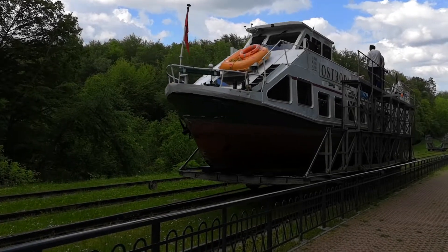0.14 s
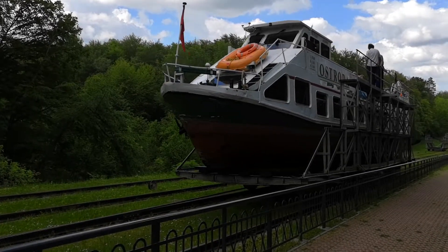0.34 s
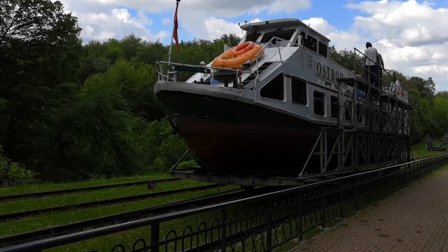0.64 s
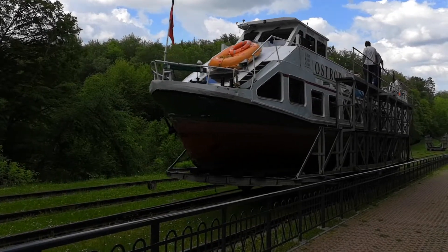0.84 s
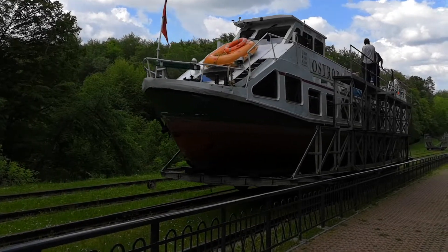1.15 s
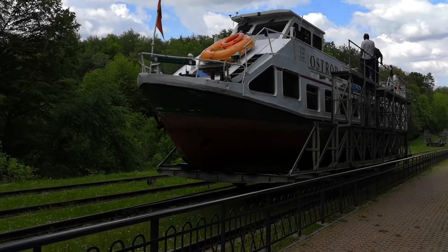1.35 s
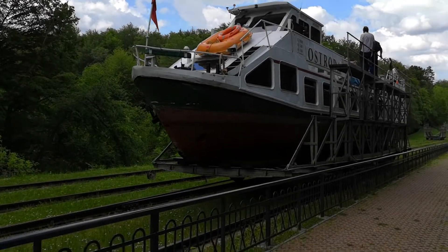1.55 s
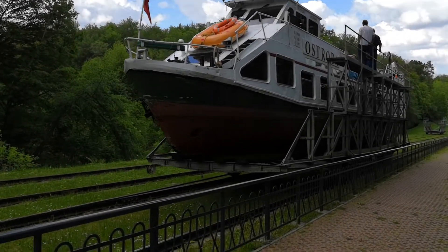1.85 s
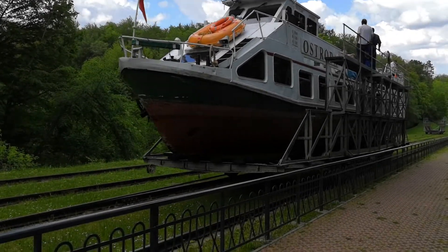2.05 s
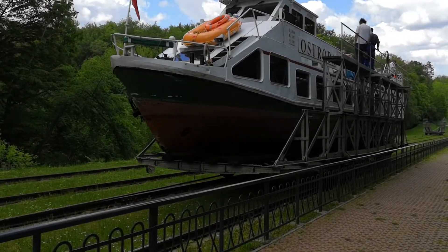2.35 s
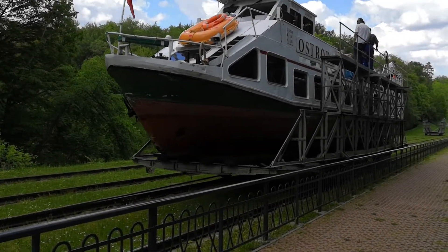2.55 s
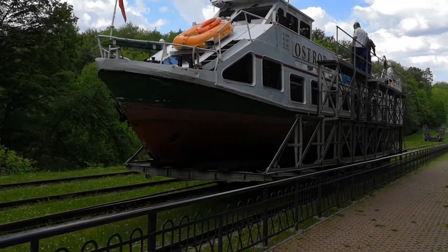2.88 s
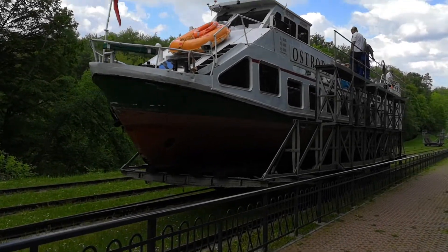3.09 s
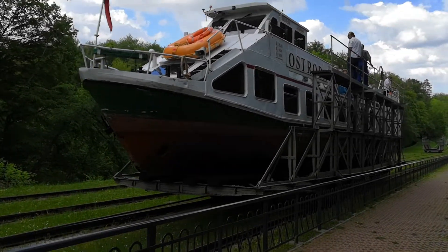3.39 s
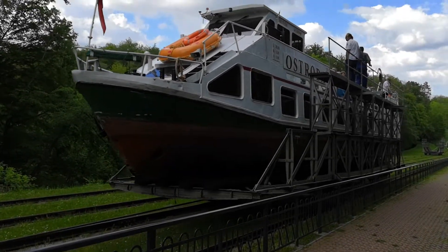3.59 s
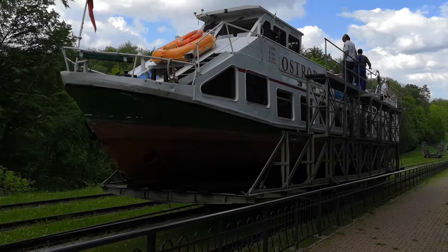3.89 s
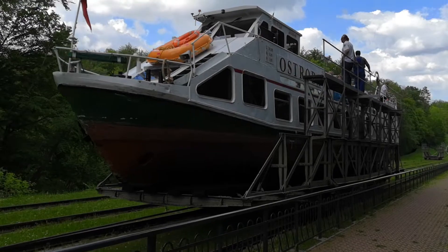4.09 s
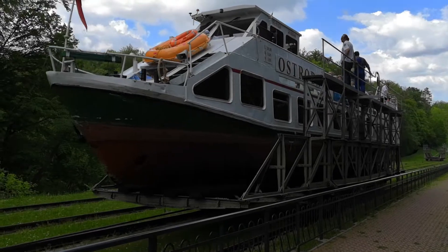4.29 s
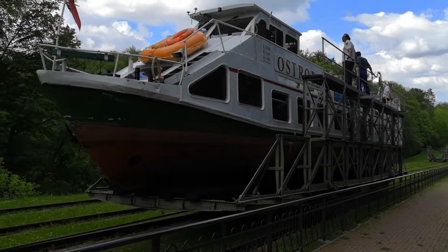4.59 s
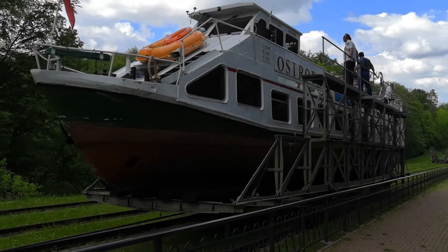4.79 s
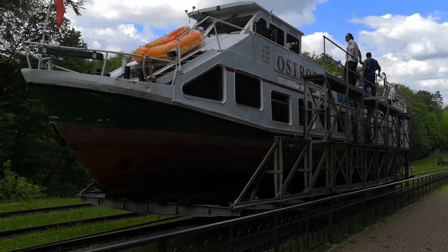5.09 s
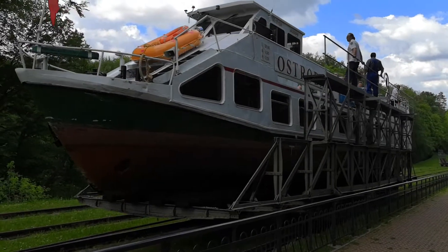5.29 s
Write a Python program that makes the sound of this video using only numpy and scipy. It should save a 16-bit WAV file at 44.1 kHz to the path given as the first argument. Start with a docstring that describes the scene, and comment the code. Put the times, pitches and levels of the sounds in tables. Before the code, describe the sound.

Two heavy metallic clunks, each trailing a rattle and jingle of loose steel, with small sharp clicks between, over quiet outdoor rumble and rustle.

```python
"""Outdoor rails by a wooded slope: a steel carriage with a boat on it, a little to the right.
Twice a wheel drops over a rail joint: noise thuds and ringing modes boom, and the frame sways.
Random blows on short noise modes make its loose parts rattle and jingle; steel clanks, unsteady tones squeak.
Filtered bursts click close by, over a low noise rumble, rustling trees and gliding bird tones."""
import sys
import numpy as np
from scipy import signal
from scipy.fft import rfft, irfft, next_fast_len
from scipy.io import wavfile
from scipy.ndimage import map_coordinates

SR = 44100
rng = np.random.default_rng(int(sys.argv[2]) if len(sys.argv) > 2 else 0)


def log_audio(samples):
    """Write samples as a 16-bit WAV file to the path given in sys.argv[1]."""
    # one column per channel
    frames = np.atleast_2d(samples).T
    # limit to full scale, then quantise
    limited = np.clip(frames, -1, 1)
    pcm = np.round(limited * 32767).astype(np.int16)
    wavfile.write(sys.argv[1], SR, pcm)


N = 239704

# likeness of the two channels, for the steel, things close by and open air: (frequency [Hz], correlation)
STEEL_ALIKE = [(110, .999), (200, .97), (330, .75), (520, .4), (900, .35), (2200, .3), (5000, .15),
               (12000, .1)]
NEAR_ALIKE = [(200, .95), (1000, .75), (2500, .45), (6000, .2)]
AIR_ALIKE = [(90, .999), (170, .96), (280, .6), (420, .1), (900, -.15), (2500, -.05), (12000, 0)]
# left level over right level, for the same three: (frequency [Hz], difference [dB])
STEEL_PAN = [(70, 0), (180, -.8), (400, -2.8), (900, -3), (2200, -4.5), (5000, -4.3), (9000, -7)]
NEAR_PAN = [(150, -16), (400, -19), (1200, -3), (2500, -1.5), (5000, -8.5), (9000, -7)]
AIR_PAN = [(60, 0), (150, -.3), (380, -3), (950, -2.7), (2400, -3.6), (6000, -3.6), (15000, -.5)]
# phase by which the left channel leads: (frequency [Hz], lead [rad])
LEFT_LEAD = [(50, -.04), (110, -.12), (200, -.27), (330, -.55), (500, -1.2), (900, .3), (2200, -1.1),
             (6000, -2)]
# the front wheel, then the rear wheel, drops over the joint: (time [s], thud [dB], rebound delay [s],
# sway [dB], rattle [dB], jingle [dB], build-up of the jingle [s])
DROPS = [(1.531, -28, .104, -33, -40, -53.5, 0.057), (4.075, -21.5, .068, -30, -42, -54.5, .04)]
HALVES = np.array([[.5], [-.5]])  # shares a left-right difference between the channels


def amp(db):
    """Decibels to gain."""
    return 10 ** (np.asarray(db) / 20)


def unit(x):
    """Scale so that the average of the channels has rms 1."""
    return x / np.sqrt(np.mean(np.atleast_2d(x).mean(0) ** 2) + 1e-20)


def along(points, hz):
    """Read (frequency [Hz], value) points on a log frequency axis."""
    f, v = np.transpose(points)
    return np.interp(np.log(hz + 1), np.log(f + 1), v)


def clock(size=N):
    """Seconds, sample by sample."""
    return np.arange(size) / SR


def curves(rows, outside=None):
    """One value per sample for each column after the time."""
    s, *cols = np.transpose(rows)
    return [np.interp(clock(), s, c, outside, outside) for c in cols]


def wobble(rate, size=N):
    """A smooth random curve with rate knots a second."""
    knots = rng.standard_normal(int(size * rate / SR) + 4)
    return map_coordinates(knots, [clock(size) * rate])


def filtered(x, response):
    """Filter x by a response given as a function of frequency."""
    size = x.shape[-1]
    m = next_fast_len(size + 8192)
    spectrum = rfft(x, m) * response(np.fft.rfftfreq(m, 1 / SR))
    return irfft(spectrum, m)[..., :size]


def noise(size=N):
    """Two unrelated white noises."""
    return rng.standard_normal((2, size))


def placed(pair, colour, alike, pan):
    """Two unrelated signals become one coloured stereo sound of rms 1; colour gives dB at each Hz."""
    def mid_side(hz):
        # the angle between mid and side sets how alike the channels are
        turn = np.arccos(np.clip(along(alike, hz), -1, 1)) / 2
        return amp(colour(hz)) * [np.cos(turn), np.sin(turn)]

    def ports(hz):
        return amp(HALVES * along(pan, hz)) * np.exp(1j * HALVES * along(LEFT_LEAD, hz))

    mid, side = filtered(pair, mid_side)
    return unit(filtered(np.array([mid + side, mid - side]), ports))


def bed(pair, spectrum, alike=STEEL_ALIKE, pan=STEEL_PAN):
    """A stereo sound whose spectrum is given as points."""
    return placed(pair, lambda hz: along(spectrum, hz), alike, pan)


def hump(hz, centre_hz, octaves):
    """A broad resonance, in dB."""
    return -20 * np.log10(1 + (np.log2((hz + 1) / centre_hz) / octaves) ** 2 / 2)


def dying(t, t60, attack):
    """A quick rise, then a steady fall of 60 dB in every t60 seconds."""
    return np.exp(-np.log(1000) * t / max(t60, 1e-3)) * (1 - np.exp(-t / attack))


def struck(x, envelope):
    """Shape a noise by an envelope; every blow of the same strength carries the same energy."""
    return unit(x * envelope) * np.sqrt(np.mean(envelope ** 2))


def add(out, s, x):
    """Mix x into out from time s."""
    part = out[:, max(round(s * SR), 0):][:, :x.shape[-1]]
    part += x[..., :part.shape[1]]


def wheel(drop, thud, column):
    """A wheel meets both edges of the gap and rebounds: noise thuds, with the frame's modes ringing on."""
    # frame modes: (frequency [Hz], t60 [s], front-wheel strike [dB], rear-wheel strike [dB])
    frame_modes = [(53.9, 1, -38, -41), (101.8, 0.43, -30.5, -41), (134.5, 0.2, -46, -22),
                   (157, 0.45, -50, -36), (214, 0.5, -37.5, -28.5), (270.1, 0.43, -30, -48),
                   (316.5, 0.32, -32, -28.5), (427.5, 0.79, -41, -46), (521, 0.33, -31.5, -37),
                   (601, 0.23, -49, -38), (636, 0.43, -41.5, -52), (846, 0.34, -59, -39.5),
                   (920, 0.61, -42, -53), (954, 0.73, -56, -50), (1073, 0.31, -60, -49),
                   (1275, 0.64, -48.5, -49)]
    out, t = np.zeros((2, N)), clock(SR)
    s, db, rebound = drop[:3]
    second_edge, rebound_loss_db = 0.023, 9.5  # delay [s], level [dB]
    for delay, loss_db in [(0, 0), (second_edge, 0), (rebound, rebound_loss_db)]:
        blow = struck(bed(noise(SR), thud), dying(t, t60=0.16, attack=0.0055))
        add(out, s + delay, amp(db - loss_db) * blow)
    for hz, t60, *strengths in frame_modes:
        phase = 2 * np.pi * hz * t + 0.36 * wobble(19.5, SR)  # slack joints unsettle the pitch
        ring = np.sin(phase + HALVES * along(LEFT_LEAD, hz)) * amp(HALVES * along(STEEL_PAN, hz))
        add(out, s, amp(strengths[column]) * dying(t, t60, attack=0.0084) * ring)
    return out


def wheels():
    """The front wheel, then the rear wheel, excites the same frame with its own thud and mode strengths."""
    # thud spectra: (frequency [Hz], level per Hz [dB])
    front_thud = [(53, -30), (90, -3), (271, 3), (463, -5.5), (524, -19), (734, -4), (923, -1.5),
                  (1060, -19), (1250, -5.5), (1350, -18.5), (2180, -27), (2390, -17), (3500, -51),
                  (4550, -70), (7700, -120)]
    rear_thud = [(41, -36), (75, -13), (120, 4.5), (165, 0.5), (215, 5.5), (268, -30), (331, -5),
                 (430, -6.5), (540, -17), (740, -17), (830, -19), (1090, -15), (1400, -22.5), (2480, -20),
                 (3500, -30.5), (7000, -110)]
    return wheel(DROPS[0], front_thud, column=0) + wheel(DROPS[1], rear_thud, column=1)


def settling(start, rise, hold, sag, extra_fall):
    """Motion after a jolt builds up, sags while the frame rocks, then falls faster to a faint hum."""
    t = np.maximum(clock() - start, 0)
    rocking = amp(-sag * t - extra_fall * np.maximum(t - hold, 0))
    lingering = amp(-15) * dying(t, t60=2.07, attack=.05)
    return (1 - np.exp(-(t / rise) ** 3)) * np.hypot(rocking, lingering)


def chatter(rate, t60, spread_db, ringing, count):
    """Loose parts strike at random, rate blows a second in all; each has short noisy modes and a dry contact."""
    out, t = np.zeros((2, N)), clock(SR // 3)
    for _ in range(count):
        happens = rng.random(N) < rate / count / SR
        hits = happens * amp(spread_db * np.clip(rng.standard_normal(N), -2, 2))
        contact = dying(t, t60=0.0076, attack=0.00013)
        part = noise(len(t)) * (ringing * dying(t, t60, attack=0.0011) + contact)
        out += signal.oaconvolve(hits[None], part, axes=1)[:, :N]
    return out


def bar_modes(hz):
    """The narrow resonances of the long bars add in power; the result is in dB."""
    # bar resonances: (centre [Hz], width [Hz], level [dB])
    bars = [(1567, 10, -7), (1700, 40, -15), (1950, 42, 4), (2020, 17, -4), (2530, 27, -3), (2540, 76, 7),
            (2670, 16, -15), (2826, 96, -0.5), (3060, 14, -10), (3126, 47, 2), (3190, 18, -11),
            (3570, 10, -1), (3783, 51, -0.5), (5660, 78, -8.5)]
    powers = [amp(db) ** 2 / (1 + (2 * (hz - centre) / width) ** 2) ** 2 for centre, width, db in bars]
    return 10 * np.log10(sum(powers))


def shaking():
    """The jolted frame sways; heavy bars rattle and light fittings jingle until it settles."""
    # spectra of the three motions: (frequency [Hz], level per Hz [dB])
    sway_spectrum = [(15, -37), (28, -14), (40, 7), (53, 2), (75, 0), (110, 1), (160, -1.5), (215, 0),
                     (360, -16.5), (500, -8.5), (800, -25), (1400, -110)]
    rattle_spectrum = [(160, -19), (280, 0.5), (362, -5.5), (486, -6.5), (607, -13), (935, -7),
                       (1310, -11.5), (1410, -11.5), (1600, -8.5), (2280, -12), (2590, -13), (3730, -22),
                       (4040, -24.5), (4600, -27), (5980, -44), (10100, -120)]
    jingle_spectrum = [(2000, -30), (3200, 6), (3800, -10.5), (4300, -2), (5500, 0.5), (7000, -3),
                       (8200, -7.5), (9600, -10), (11000, -25), (13000, -35), (15500, -57)]
    # how each settles: (hold [s], sag [dB per s], extra fall after the hold [dB per s])
    sway_settles = (0.39, 42.8, 140)
    rattle_settles = (.31, 20.8, 99)
    jingle_settles = (0.26, 3.8, 82)
    sway, rattle, jingle = np.zeros((3, N))
    for s, _, _, sway_db, rattle_db, jingle_db, jingle_rise in DROPS:
        rattle_rise = 0.59 * jingle_rise  # heavy parts get going sooner than light ones
        sway += amp(sway_db) * settling(s, 0.0096, *sway_settles)
        rattle += amp(rattle_db) * settling(s, rattle_rise, *rattle_settles)
        jingle += amp(jingle_db) * settling(s, jingle_rise, *jingle_settles)
    low = sway * bed(noise(), sway_spectrum)
    heavy_blows = chatter(rate=420, t60=0.16, spread_db=3.5, ringing=0.46, count=3)
    bar_ring = placed(heavy_blows, bar_modes, STEEL_ALIKE, STEEL_PAN)
    bars = rattle * (bed(heavy_blows, rattle_spectrum) + amp(-10.5) * bar_ring)
    light_blows = chatter(rate=650, t60=0.22, spread_db=4.5, ringing=0.57, count=3)
    fittings = jingle * bed(light_blows, jingle_spectrum)
    return low + bars + fittings


def clanks():
    """Loose steel slams home: single short noise bursts, each through its own broad resonance."""
    # blows: (time [s], level [dB], centre [Hz])
    blows = [(1.576, -44.5, 2850), (1.647, -36.5, 2720), (1.678, -33, 2220), (1.699, -39, 5800),
             (1.716, -39.5, 4000), (1.734, -38.5, 1600), (1.800, -33.5, 2470), (1.865, -45.5, 2980),
             (2.537, -51.5, 1280), (4.196, -32, 2040), (4.248, -38, 2600), (4.297, -39.5, 2400),
             (4.342, -42.5, 2500), (4.44, -45.5, 2480), (4.545, -47.5, 1430), (4.655, -54, 1800)]
    treble_cut = [(9500, -6), (12500, -8), (15000, -21)]  # (frequency [Hz], gain [dB])
    out, t = np.zeros((2, N)), clock(SR // 3)
    for s, db, hz in blows:
        colour = lambda f: 1.42 * hump(f, hz, octaves=0.41) + along(treble_cut, f)
        steel = placed(noise(len(t)), colour, STEEL_ALIKE, STEEL_PAN)
        add(out, s, amp(db) * struck(steel, dying(t, t60=0.056, attack=0.0016)))
    return out


def squeaks():
    """Steel rubs on steel and sings: thin unsteady tones swell, flutter and ring out."""
    # tones: (time of the peak [s], frequency [Hz], level [dB], t60 [s])
    tones = [(1.599, 6800, -56, .2), (1.605, 3710, -50, 0.45), (1.62, 10800, -63, 0.22),
             (1.628, 11670, -61, .12), (1.635, 7730, -43.5, 0.14), (1.72, 9760, -57, .17),
             (1.76, 3330, -52, .17), (1.82, 7900, -69, .45), (1.888, 2840, -61.5, 0.54),
             (3.125, 9500, -75, .1), (4.308, 7900, -63, 0.73), (4.45, 2690, -53.5, .18),
             (4.468, 2830, -63, 0.98)]
    rise = .023  # s
    out, t = np.zeros((2, N)), clock(SR)
    since = t - 2 * rise  # time from the peak
    for s, hz, db, t60 in tones:
        ring_out = np.exp(-np.log(1000) * np.abs(since) / t60)
        swell = np.where(since < 0, np.exp(-(since / rise) ** 2), ring_out)
        channels = []
        for _ in range(2):
            flutter = amp(3.6 * wobble(47, SR))
            channels.append(flutter * np.sin(2 * np.pi * hz * t + 1.1 * wobble(165.0, SR)))
        tone = np.array(channels) * amp([[-7], [0]])  # weaker on the left
        add(out, s + since[0], amp(db) * struck(tone, swell))
    return out


def ping(hz, db, t60):
    """One brief ring of a small thing close by."""
    t = clock(SR // 3)
    ring = np.sin(2 * np.pi * hz * t + HALVES * along(LEFT_LEAD, hz)) * dying(t, t60, attack=0.0014)
    return amp(db + HALVES * along(NEAR_PAN, hz)) * ring


def click(db, t60, body, tilt_db=0):
    """A short burst in a small hard body; the surroundings answer faintly."""
    t = clock(SR // 3)
    colour = lambda hz: along(body, hz) + tilt_db * np.log2((hz + 1) / 2000)  # tilt in dB per octave
    burst = placed(noise(len(t)), colour, NEAR_ALIKE, NEAR_PAN)
    answer = amp(-27) * dying(t, t60=0.26, attack=0.0036)
    return amp(db) * struck(burst, dying(t, t60, attack=0.00034) + answer)


def knock():
    """Something hard touches, strikes and chatters to rest; later bounces are lighter, brighter and longer."""
    # spectrum of the body: (frequency [Hz], level per Hz [dB])
    knock_body = [(210, -52), (400, -46), (550, -16), (1000, -8), (1200, -17), (1600, -1.5), (2100, -8.5),
                  (2460, 0.5), (3200, -11), (3950, -18), (4450, -43), (5700, -15.5), (6300, -32),
                  (9000, -26), (15000, -50)]
    # ringing modes: (frequency [Hz], level [dB], t60 [s])
    knock_modes = [(598, -52, .06), (1000, -44, 0.091), (1585, -45, 0.037), (2405, -35, 0.034),
                   (3980, -46, .03), (5750, -54, 0.039)]
    strike, strike_db, strike_t60 = 3.2369, -24, 0.014  # time [s], level [dB], t60 [s]
    touch_lead, bounce_gap = .0016, .0027  # s
    out = np.zeros((2, N))
    add(out, strike - touch_lead, click(-35, strike_t60, knock_body, tilt_db=5.5))
    for k in range(4):
        bounce = click(strike_db - 11.5 * k, strike_t60 * 1.7 ** k, knock_body, tilt_db=1.4 * k)
        add(out, strike + k * bounce_gap, bounce)
    add(out, strike, sum(ping(*mode) for mode in knock_modes))
    return out


def snaps():
    """Grit snaps on the paving: each piece cracks as a noise burst and rings at its own pitch."""
    # cracks: (time [s], level [dB], t60 [s], treble tilt [dB per octave], ring [Hz], ring level [dB])
    cracks = [(2.808, -50.5, 0.034, -8, 587, -58), (2.9998, -47.5, 0.025, 4, 1027, -49.5),
              (3.665, -47.5, 0.14, 3.5, 1475, -49), (3.7096, -29.5, 0.017, 4, 3370, -48),
              (3.714, -41.5, 0.033, 1, 1132, -38.5), (3.731, -44.5, 0.081, -2, 1360, -39),
              (3.813, -53.5, 0.054, -1, 1110, -70), (5.301, -51.5, 0.019, -6.5, 1725, -54)]
    # spectrum before the tilt: (frequency [Hz], level per Hz [dB])
    snap_body = [(240, -43), (400, -22), (550, 4.5), (830, -2.5), (1150, 4), (1550, 9), (2150, -9),
                 (2550, 3), (3080, 0), (4070, -15), (5100, -11), (6300, -22.5), (7350, -20), (9200, -29),
                 (11600, -44), (15000, -58)]
    out = np.zeros((2, N))
    for s, db, t60, tilt_db, ring_hz, ring_db in cracks:
        add(out, s, click(db, t60, snap_body, tilt_db) + ping(ring_hz, ring_db, t60=0.068))
    return out


def ticks():
    """Faint bright ticks, each a very short noise burst."""
    # ticks: (time [s], level [dB])
    tick_times = [(0.235, -59), (0.6295, -65), (0.7262, -62), (1.196, -49), (2.9272, -59), (2.9672, -58),
                  (2.9982, -43.5), (3.0595, -54.5), (3.5533, -63), (5.1257, -59), (5.3004, -60),
                  (5.3237, -58)]
    # their spectrum: (frequency [Hz], level per Hz [dB])
    tick_body = [(1000, -10), (4000, -2), (7000, -6), (9200, 5.5), (11000, -9.5), (15000, -22)]
    out = np.zeros((2, N))
    for s, db in tick_times:
        add(out, s, click(db, 0.011, tick_body))
    return out


def scuffs():
    """Soft scuffs and low bumps: bell-shaped swells of narrow noise."""
    # swells: (time of the peak [s], level [dB], centre [Hz], half length [s], half of the hump's width [octaves])
    swells = [(0.158, -78, 8700, 0.083, 0.098), (1.241, -71.5, 8260, 0.051, 0.15),
              (1.45, -55, 115, 0.016, 0.32), (3.105, -44.5, 62, 0.022, 0.36), (3.15, -55, 193, 0.027, 0.11),
              (3.637, -57, 2080, 0.021, 0.3), (3.899, -51.5, 69.5, 0.057, 0.34)]
    out, t = np.zeros((2, N)), clock(SR // 2)
    for s, db, hz, length, octaves in swells:
        start = max(s - t[-1] / 2, 0)
        rub = placed(noise(len(t)), lambda f: 2 * hump(f, hz, 2 * octaves), STEEL_ALIKE, STEEL_PAN)
        add(out, start, amp(db) * np.exp(-((start + t - s) / length) ** 2 / 2) * rub)
    return out


def bird():
    """One thin buzzy chirp of wavering pitch, scattered by the trees as a dying noise echo."""
    # path of the chirp: (time [s], frequency [Hz], level [dB])
    chirp = [(4.928, 7200, -85), (4.945, 8220, -58.5), (4.962, 8000, -62), (4.98, 7870, -67),
             (4.992, 8300, -76), (5.02, 8000, -84)]
    hz, db = curves(chirp, outside=-120)
    call = amp(db) * np.sin(2 * np.pi * np.cumsum(hz + 170 * wobble(540)) / SR)
    trees = noise(SR // 3) * dying(clock(SR // 3), t60=0.16, attack=.002)
    trees /= np.linalg.norm(trees[0])
    return call + 1.35 * signal.oaconvolve(call[None], trees, axes=1)[:, :N]


def far_birds():
    """Faint short whistles from the wood: bell-shaped tones, some gliding upward."""
    # whistles: (time of the peak [s], frequency [Hz], level [dB], half length [s], glide [Hz per s])
    whistles = [(.35, 6800, -86, 0.032, 6000), (0.956, 6700, -91, .04, 5000), (1.015, 4130, -73, 0.022, 0),
                (5.239, 3560, -66, 0.0074, 19993), (5.41, 3620, -68, .009, 25000)]
    out, t = np.zeros((2, N)), clock(SR // 2) - .25
    for s, hz, db, length, glide in whistles:
        phase = 2 * np.pi * (hz * t + glide * t ** 2 / 2) + 0.5 * wobble(152, len(t))
        add(out, s + t[0], amp(db) * np.exp(-(t / length) ** 2 / 2) * np.sin(phase))
    return out


def outdoors():
    """Low rolling rumble; a light breeze moves the rustle of the wooded slope and a fine hiss."""
    # spectra of the open air: (frequency [Hz], level per Hz [dB])
    rumble_spectrum = [(12, -37), (20, -17), (38, -4.5), (59, 0), (91, -4.5), (112, -7), (216, -13.5),
                       (318, -20), (364, -22.5), (404, -20.5), (594, -28.5), (700, -40), (910, -59),
                       (1540, -120)]
    rustle_spectrum = [(260, -14), (450, -5.5), (596, -6), (930, -0.5), (1390, -3), (1650, 0), (2100, 0.5),
                       (2410, -2), (2840, -2.5), (3130, -7.5), (6000, -18), (7800, -74), (13200, -120)]
    hiss_spectrum = [(2650, -42), (4500, -12.5), (6180, -6.5), (6710, -2.5), (9300, -6), (11000, -13),
                     (12800, -12.5), (15600, -14.5)]
    # the breeze in the trees: (time [s], strength [dB])
    breeze = [(0, 0.4), (.44, 1.2), (.7, -0.8), (.95, -0.6), (1.27, 1.8), (1.45, 0.6), (2.5, .7),
              (3.0, -.5), (3.5, -0.5), (4.0, 0.5), (4.9, -0.65), (5.43, 0.2)]
    breeze_db = curves(breeze)[0] + .35 * wobble(7)
    rumble = amp(-57 + 0.54 * wobble(9)) * bed(noise(), rumble_spectrum, AIR_ALIKE, AIR_PAN)
    rustle = amp(-64.5 + breeze_db) * bed(noise(), rustle_spectrum, AIR_ALIKE, AIR_PAN)
    hiss = amp(-80.5 + breeze_db) * bed(noise(), hiss_spectrum, AIR_ALIKE, AIR_PAN)
    return rumble + rustle + hiss


def scene():
    """The carriage, the small sounds nearby, the birds and the open air."""
    carriage = wheels() + shaking() + clanks() + squeaks()
    nearby = knock() + snaps() + ticks() + scuffs()
    return carriage + nearby + bird() + far_birds() + outdoors()


def record(dry):
    """Keep nothing above the band limit."""
    top_hz = 15720
    return filtered(dry, lambda hz: hz < top_hz)


dry = scene()
out = record(dry)
log_audio(out)
```